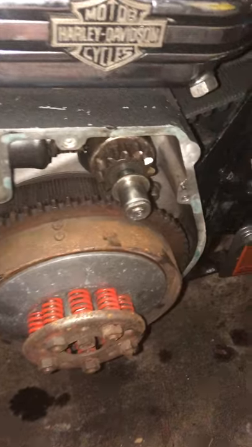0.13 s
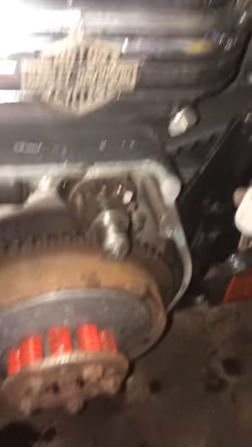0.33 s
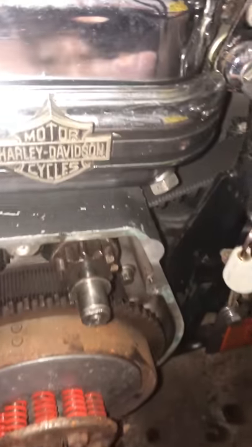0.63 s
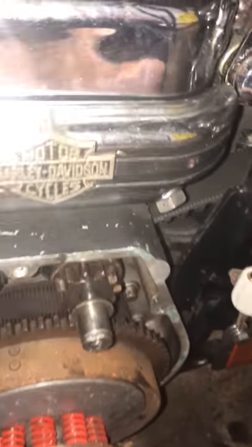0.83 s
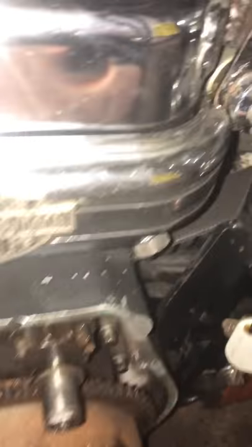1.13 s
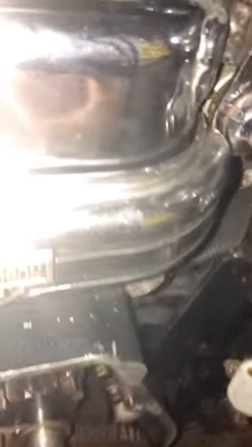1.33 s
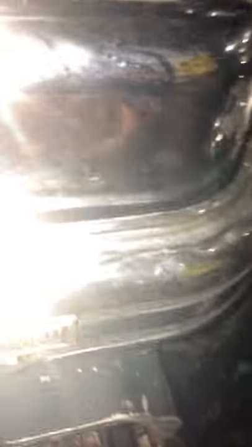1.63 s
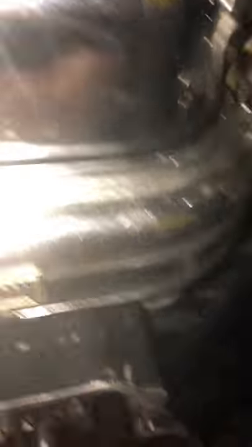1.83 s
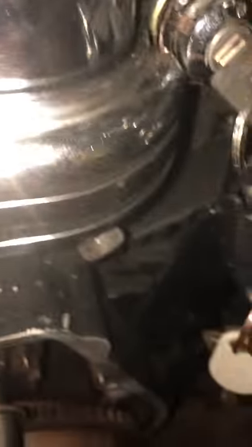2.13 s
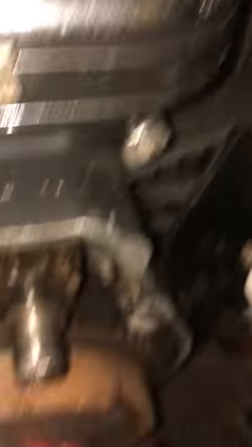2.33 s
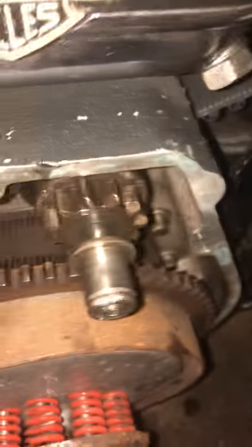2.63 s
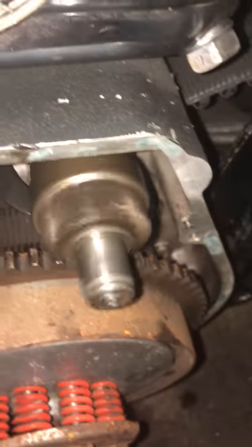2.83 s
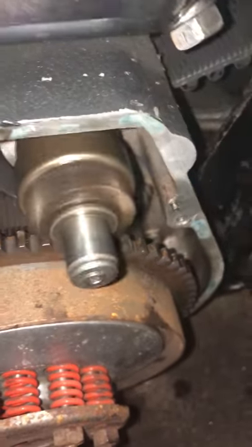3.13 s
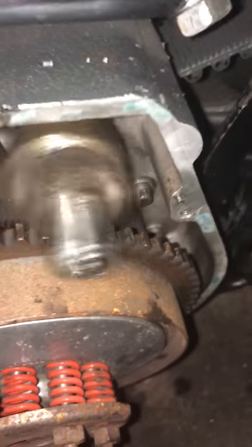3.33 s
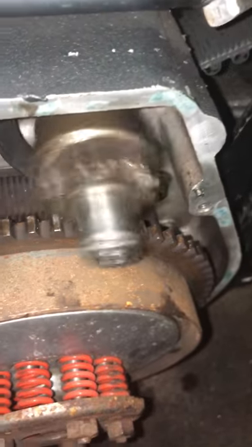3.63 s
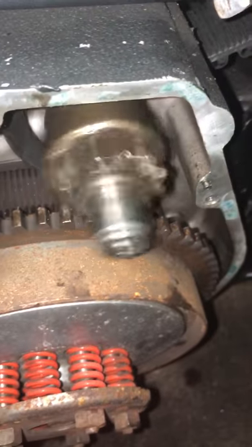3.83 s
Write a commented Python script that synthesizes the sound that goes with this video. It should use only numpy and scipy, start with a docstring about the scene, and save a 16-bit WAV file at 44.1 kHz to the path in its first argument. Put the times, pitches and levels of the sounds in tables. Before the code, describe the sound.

A starter motor whirrs, its gear clattering and grinding, after a few light knocks.

```python
"""Starter motor in an open engine case

After a few small handling knocks, a starter motor is fired close by. Its pinion clashes against the
ring gear, spins free with a rising whine, then rattles over the teeth, faster and slower. Each impact
excites the resonant modes of gear and case. Behind it: low rumble, insects and a fading engine hum."""
import sys
import numpy as np
from scipy import signal
from scipy.fft import rfft, irfft
from scipy.io import wavfile

SR = 44100
rng = np.random.default_rng(int(sys.argv[2]) if len(sys.argv) > 2 else 0)


def master(y):
    """Save y as 16-bit WAV."""
    cut = np.clip(np.atleast_2d(y).T, -1, 1)
    pcm = np.round(cut * 32767)  # scale
    wavfile.write(sys.argv[1], SR, pcm.astype(np.int16))


N = 176400
T = np.arange(N) / SR
HZ = np.fft.rfftfreq(N, 1 / SR)

# Pinion teeth striking the ring gear: t/s, level/dB (levels in all tables are relative)
TOOTH_STRIKES = [(2.738, -6.5), (2.7538, -7), (2.771, -8), (2.824, -13), (2.854, -9), (2.872, -5.5),
                 (2.89, -10), (2.921, -6), (2.939, -7.5), (3.268, -6.5), (3.287, -7.5), (3.3119, -6),
                 (3.343, -10), (3.358, -6.5), (3.368, -8), (3.384, -13), (3.396, -12), (3.414, -11.5),
                 (3.43, -9.5), (3.444, -11.5), (3.829, -13.5), (3.851, -10.5), (3.872, -12.5),
                 (3.894, -10.5), (3.921, -9.5), (3.943, -11), (3.972, -14)]
# Spectral envelope of a tooth strike: f/Hz, level/dB
STRIKE_SPECTRUM = [(200, -22.5), (1400, -1.5), (3000, -5.5), (4500, 2.5), (11000, 2), (13000, -3),
                   (15500, 0)]
# Resonances of the gear: f/Hz, width/Hz, level/dB
GEAR_RESONANCES = [(4570, 190, 2.5), (6430, 560, 3.5), (9600, 410, 5.5)]
# Resonances of the struck case: f/Hz, width/Hz, level/dB
CLANK_RESONANCES = [(560, 175, -7), (1027, 270, 1.5), (1483, 180, 6.5), (2240, 1150, -0.5)]
# Envelope of the grinding gears: t/s, level/dB
GRIND_ENVELOPE = [(2.730, -46), (2.742, -26.5), (2.78, -19), (2.94, -23), (3.0, -26.5), (3.25, -27),
                  (3.37, -24.5), (3.53, -22.5), (3.62, -21), (3.78, -26)]
STARTER_ON_S = GRIND_ENVELOPE[0][0]
STRIKE_RISE_S, STRIKE_HOLD_S, STRIKE_DECAY_S = 0.00041, 0.002, 0.0029


def amp(db):
    """Amplitude ratio of a level in decibels."""
    return 10 ** (np.asarray(db) / 20)


def unit(x):
    """Normalisation to rms 1."""
    return x / np.sqrt(np.mean(x ** 2) + 1e-20)


def curve(rows, column=1):
    """Linear interpolation of one table column in time."""
    rows = np.array(rows)
    return np.interp(T, rows[:, 0], rows[:, column])


def colour(points):
    """Magnitude response through (f/Hz, level/dB) points, interpolated in log frequency."""
    hz, db = np.transpose(points)
    return amp(np.interp(np.log(HZ + 1), np.log(hz), db))


def peaks(modes):
    """Magnitude response of steep-sided resonances that add in power."""
    gains = (amp(db) / (1 + ((HZ - hz) / (0.66 * width)) ** 2) for hz, width, db in modes)
    return np.sqrt(sum(gain ** 2 for gain in gains))


def boosts(modes):
    """Magnitude response of resonances standing above a flat floor."""
    return amp(sum(db / (1 + (2 * (HZ - hz) / width) ** 2) for hz, width, db in modes))


def body(x, gain):
    """Minimum-phase filter of unit power gain, made causal by folding the cepstrum."""
    log_gain = np.log(np.maximum(unit(gain), 1e-5))
    cepstrum = irfft(log_gain, N)
    cepstrum[1:N // 2] *= 2
    cepstrum[N // 2 + 1:] = 0
    impulse_response = irfft(np.exp(rfft(cepstrum)), N)[:N // 20]
    return signal.fftconvolve(x, impulse_response)[:N]


def noise():
    """Gaussian white noise."""
    return rng.standard_normal(N)


def wander(hz):
    """Random modulation: low-pass noise of rms 1."""
    return unit(irfft(rfft(noise()) * np.exp(-(HZ / hz) ** 2), N))


def burst(start, rise, hold, decay):
    """Envelope with a linear rise and exponential decay; times in seconds."""
    age = T - start
    return np.clip(age / rise, 0, 1) * np.exp(-np.clip((age - hold) / decay, 0, 20))


def room(x, t60):
    """Diffuse reverberation: convolution with decaying noise of weakened treble."""
    t = T[:SR // 2]
    dull_noise = signal.lfilter([1], [1, -2 / 3], rng.standard_normal(len(t)))
    tail = dull_noise * amp(-60 * t / t60) * (t > .004)
    return signal.fftconvolve(x, tail / np.linalg.norm(tail))[:N]


def rumble():
    """Low-frequency noise that sinks by 9 dB over the starter's first second."""
    # Spectral envelope: f/Hz, level/dB
    spectrum = [(25, -34), (54, 3.5), (80, -2), (300, -17.5), (1500, -36), (9000, -44.5)]
    return amp(-52) * body(noise(), colour(spectrum)) * amp(-9 * np.clip(T - STARTER_ON_S, 0, 1))


def insects():
    """Narrow-band noise: steady for the chorus, gated for two trills of a nearer insect."""
    # Bands of the chorus: f/Hz, width/Hz, level/dB
    bands = [(4797, 390, -3), (5970, 360, -7.5)]
    # Trills: t/s, duration/s, level/dB
    trills = [(0.244, 0.23, -61.5), (2.335, 0.23, -59)]
    chorus = amp(-62.5) * body(noise(), peaks(bands))
    envelope = sum(amp(db) * burst(t, 0.039, length, 0.014) for t, length, db in trills)
    return chorus + envelope * body(noise(), peaks([(5157, 110, 0)]))


def distant_engine():
    """A nearly periodic source gives a harmonic hum, which fades together with its road noise."""
    # Harmonics of the hum: order, level/dB
    harmonics = [(4, -3.5), (5, 1), (7, -1.5), (8, -4), (10, -6.5), (12, -5)]
    fundamental_hz, fade_db_per_s = 64.7, 10
    cycles = np.cumsum(fundamental_hz * (1 + 0.0086 * wander(6.26))) / SR
    hum = sum(amp(db) * np.sin(2 * np.pi * k * cycles) * amp(2.4 * wander(0.9)) for k, db in harmonics)
    road = body(noise(), peaks([(474, 1210, 0)]))
    return (amp(-54) * unit(hum) + amp(-58.5) * road) * amp(-fade_db_per_s * T)


def knocks():
    """Brief contacts radiate broadband clacks: loose metal parts, first handled, then driven."""
    # Contacts: t/s, level/dB
    contacts = [(0.694, -48), (1.207, -41), (1.2356, -25), (1.2418, -34.5), (1.2551, -36.5), (1.4016, -28),
                (1.4151, -27.5), (1.505, -42.5), (1.5278, -32), (1.69, -47), (1.7318, -41), (2.826, -7.5),
                (3.130, -17.5), (3.177, -17), (3.222, -10.5)]
    # Spectral envelope of a clack: f/Hz, level/dB
    spectrum = [(500, -16.5), (1900, 3.5), (2800, 2), (4100, 9), (5500, 2), (15500, -4)]
    envelope = sum(amp(db) * burst(t, 0.000092, 0.00079, 0.0033) for t, db in contacts)
    clacks = body(noise() * envelope, colour(spectrum))
    return clacks + amp(-13) * room(clacks, t60=0.3)


def rustle():
    """Friction noise, faint and ticking, as a hand shifts its grip."""
    grain = unit(noise() * amp(3.9 * wander(300)))
    envelope = amp(-63) * burst(0.758, rise=0.048, hold=0.3, decay=0.21)
    return body(grain * envelope, colour([(2200, -0.5), (16000, -6)]))


def grind():
    """Forced vibration: clumps of tiny impacts ring the case, whose bass shudders underneath."""
    # Spectral envelope of the grinding: f/Hz, level/dB
    spectrum = [(100, -65), (330, -23), (480, -3), (2000, -1.5), (3100, -9), (4600, -5.5), (10000, -13),
                (13000, -17), (15500, -26)]
    # Resonances of the driven case: f/Hz, width/Hz, level/dB
    case_modes = [(565, 30, 8), (1031, 190, 9.5), (1412, 120, 10), (2034, 85, 8)]
    # Bass envelope of the shaking case: t/s, level/dB
    shudder = [(2.78, -34.5), (2.97, -38.5), (3.1, -50), (3.34, -53), (3.372, -28.5), (3.41, -53),
               (3.466, -31.5), (3.56, -50), (3.61, -30), (3.70, -37), (3.85, -63)]
    grit = unit(noise() * amp(3.1 * wander(112) + 2.45 * wander(2800)))
    running = T > STARTER_ON_S
    gears = body(grit * running * amp(curve(GRIND_ENVELOPE) - 3), colour(spectrum) * boosts(case_modes))
    bass_response = colour([(40, -20), (120, 3.5), (500, 2), (1700, -23.5)])
    bass = body(noise() * running * amp(curve(shudder) - 3), bass_response)
    return gears + bass


def tooth_excitation(strikes, hold):
    """Each strike is an impulse, a short scrape and a weak tail; the noisy parts add in power."""
    power, cracks = np.zeros(N), np.zeros(N)
    for t, db in strikes:
        scrape = burst(t, STRIKE_RISE_S, hold, STRIKE_DECAY_S)
        tail = amp(-14) * burst(t, STRIKE_RISE_S, hold, decay=0.026)
        power += amp(db) ** 2 * (scrape ** 2 + tail ** 2)
        cracks[round((t + STRIKE_RISE_S) * SR)] += amp(db + 3)
    return cracks + amp(-4) * noise() * np.sqrt(power)


def rebounds(strikes):
    """Delayed response: the modes of the case give a dull clank just after each tooth strike."""
    delay_s = 0.00409
    envelope = sum(amp(db - 8.5) * burst(t + delay_s, STRIKE_RISE_S, STRIKE_HOLD_S, STRIKE_DECAY_S)
                   for t, db in strikes)
    return body(noise() * envelope, peaks(CLANK_RESONANCES)) / 2


def clashes():
    """Impact excitation: separate strikes ring the gear as the pinion fails to mesh."""
    response = colour(STRIKE_SPECTRUM) * boosts(GEAR_RESONANCES)
    return body(tooth_excitation(TOOTH_STRIKES, STRIKE_HOLD_S), response) + rebounds(TOOTH_STRIKES)


def squeaks():
    """Damped vibration of tooth edges: brief and loud as they catch, faint and longer after clashes."""
    # Edges catching: t/s, level/dB
    catches = [(2.738, -9.5), (2.836, -2.5), (2.87, -11.5), (2.936, -8.5), (2.957, -14), (2.987, -17),
               (3.273, -10.5)]
    # Modes of the edges: f/Hz, rms frequency deviation/Hz, level/dB
    edge_modes = [(9700, 190, 0), (10100, 330, 2.5)]
    catching = sum(amp(db) * burst(t, 0.00079, 0.002, 0.0039) for t, db in catches)
    ringing_on = sum(amp(db - 22) * burst(t, STRIKE_RISE_S, 0, decay=0.026) for t, db in TOOTH_STRIKES)
    tones = sum(amp(db) * np.sin(2 * np.pi * np.cumsum(hz + deviation * wander(301.2)) / SR)
                for hz, deviation, db in edge_modes)
    return (catching + ringing_on) * tones / 2


def blows():
    """Selective excitation: a heavy blow favours certain modes of the case, by where it lands."""
    # Blows on the case: t/s, level/dB, favoured f/Hz
    hits = [(2.793, -4, 1470), (2.821, -6, 620), (2.826, -1, 2110), (2.889, -4.5, 2130),
            (2.910, -7.5, 1500), (2.917, -8.5, 1400), (3.305, -9, 1300), (3.365, -12, 537),
            (3.748, -12.5, 2020)]
    focus_db = 14
    clanks = np.zeros(N)
    for t, db, hz in hits:
        response = peaks(CLANK_RESONANCES) * boosts([(hz, hz / 2, focus_db)])
        clanks += amp(db) * burst(t, 0.0026, 0.005, 0.0024) * body(noise(), response)
    return clanks / 2


def spin():
    """Rotational harmonics climb through two fixed bands as the freed motor speeds up and throbs."""
    # Run-up of the motor: t/s, fundamental f/Hz, level/dB
    run_up = [(2.94, 513.7, -27.5), (3.0, 705.7, -14.5), (3.04, 816, -17), (3.10, 966, -18),
              (3.20, 1130, -18.5), (3.26, 1173, -16), (3.29, 1270, -56)]
    # Case resonances under the whirr: f/Hz, width/Hz, level/dB
    whirr_modes = [(1123, 64, -1), (1374, 65, 1), (1502, 168, 0), (2780, 1560, -18), (11900, 220, -22)]
    # Harmonics of the whine: order, level/dB
    harmonics = [(2, 0.5), (4, 4), (6, 3), (8, -1)]
    # Metallic bands that filter the whine: f/Hz, width/Hz, level/dB
    bands = [(2090, 230, -5), (5760, 1560, -11.5)]
    envelope = amp(curve(run_up, column=2)) * (T > run_up[0][0]) * (T < run_up[-1][0])
    cycles = np.cumsum(curve(run_up) * (1 + 0.00814 * wander(131))) / SR
    shaft_turns = cycles / 15
    throb = 1 + 0.23 * np.cos(2 * np.pi * shaft_turns)
    whirr = body(noise() * throb, peaks(whirr_modes))
    rough_tone = sum(amp(db) * np.sin(2 * np.pi * k * cycles) * (1 + 0.81 * wander(170))
                     for k, db in harmonics)
    whine = irfft(rfft(rough_tone) * peaks(bands), N)
    return envelope * (amp(-5) * whirr + whine / 2)


def rattle():
    """An impact train at the tooth-passing rate: one strike for each tooth the pinion skips."""
    # Skipping of the pinion: t/s, strike rate/Hz, level/dB
    skipping = [(3.462, 62.5, -10), (3.511, 91, -15), (3.552, 104, -15), (3.590, 188, -12),
                (3.658, 108, -11.5), (3.717, 126, -12.5), (3.738, 72.2, -11), (3.797, 97, -13),
                (3.814, 59, -14.5)]
    # Extra gear resonance heard in these fast strikes: f/Hz, width/Hz, level/dB
    rattle_mode = [(8160, 330, 10)]
    rate_hz = curve(skipping) * (T > skipping[0][0]) * (T < skipping[-1][0])
    teeth_passed = np.ceil(np.cumsum(rate_hz) / SR)
    level_db = curve(skipping, column=2)
    strikes = [(T[i], level_db[i] + rng.normal(0, 1.03)) for i in np.flatnonzero(np.diff(teeth_passed))]
    response = colour(STRIKE_SPECTRUM) * boosts(GEAR_RESONANCES + rattle_mode)
    return body(tooth_excitation(strikes, hold=0.0036), response) + rebounds(strikes)


def scene():
    """Superposition of the starter, its reverberation, the handling and the background, in mono."""
    starter = clashes() + rattle() + squeaks() + blows() + grind() + spin()
    reverberation = amp(-18) * room(starter, t60=0.49)
    handling = knocks() + rustle()
    background = rumble() + insects() + distant_engine()
    return (starter + reverberation + handling + background)[None]


def record(dry):
    """Gating, clipping and band limiting: a quick fade-in, a full-scale ceiling and a low-pass."""
    start_s, cutoff_hz = 0.081, 15900
    fade_in = np.clip((T - start_s) / 0.002, 0, 1)
    clipped = np.clip(dry * fade_in, -1, 1)
    low_pass = signal.firwin(511, cutoff_hz, window=("kaiser", 9), fs=SR)
    return signal.oaconvolve(clipped, low_pass[None], "same")


dry = scene()
out = record(dry)
master(out)
```